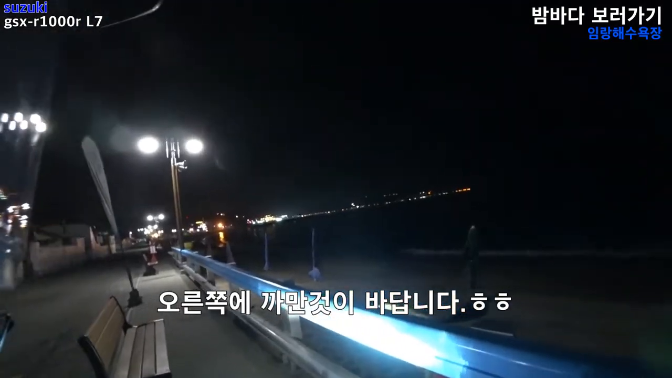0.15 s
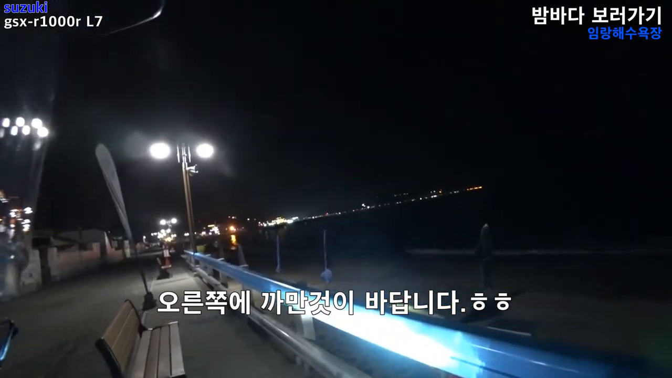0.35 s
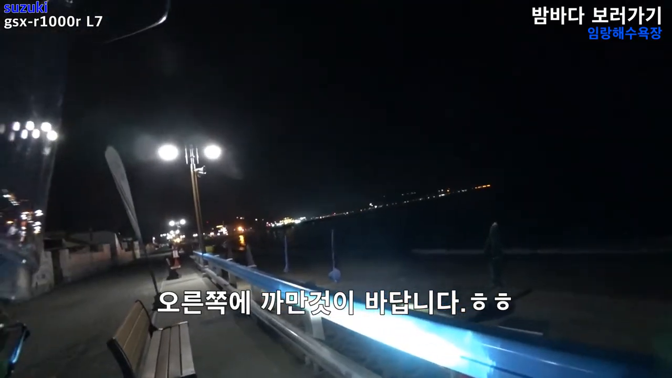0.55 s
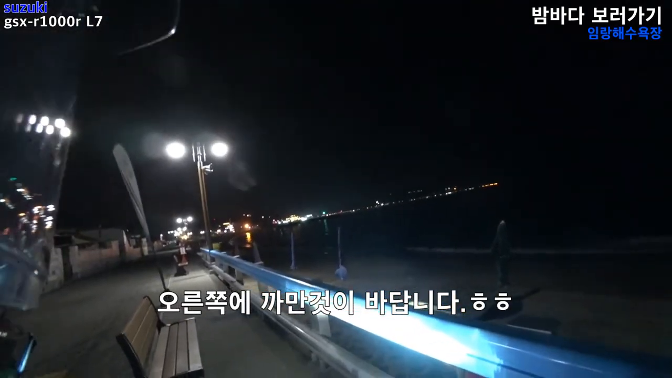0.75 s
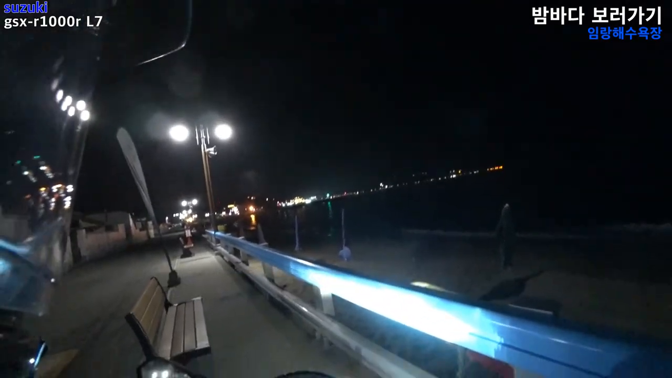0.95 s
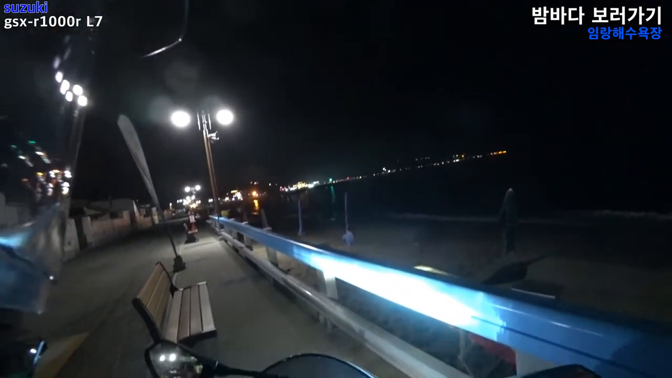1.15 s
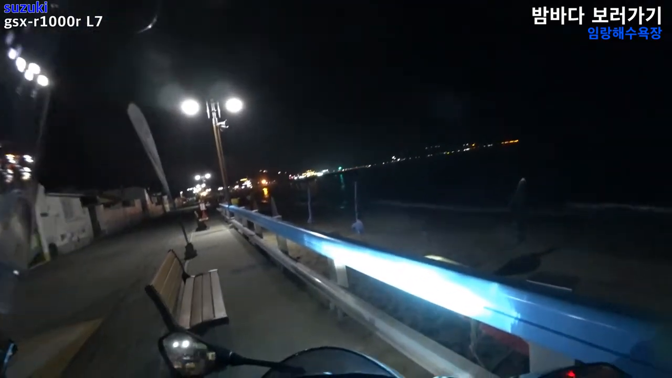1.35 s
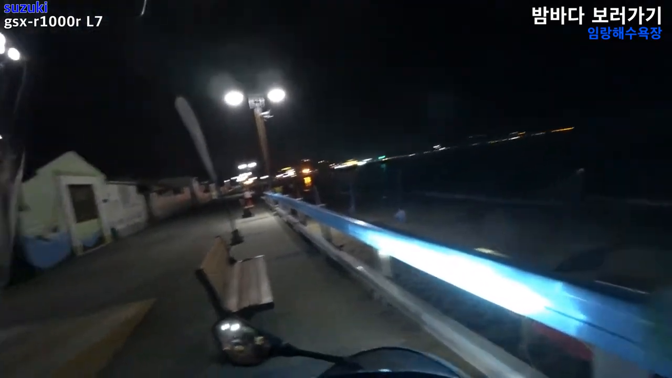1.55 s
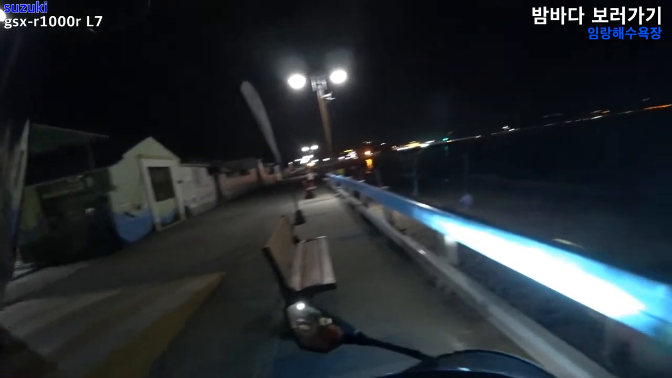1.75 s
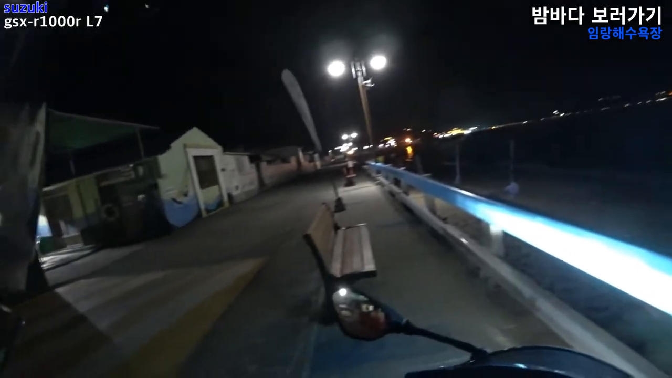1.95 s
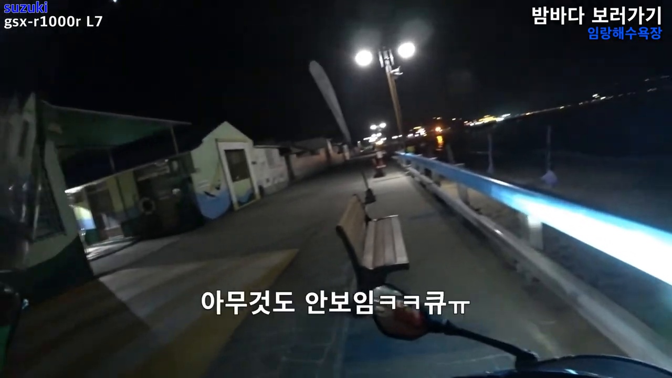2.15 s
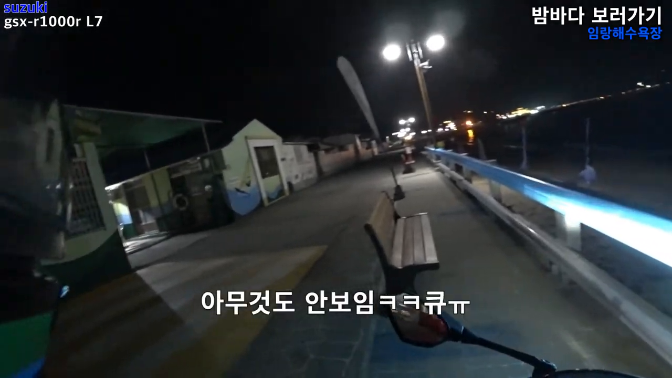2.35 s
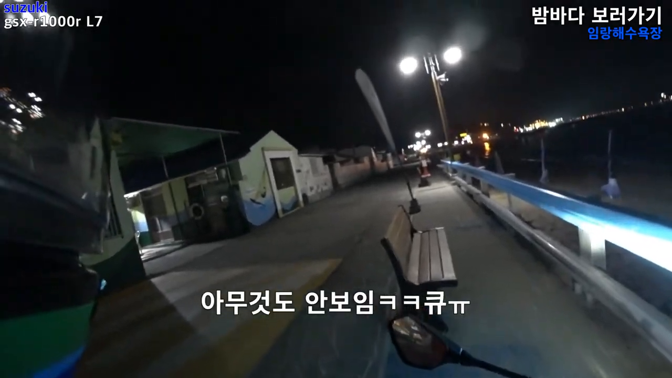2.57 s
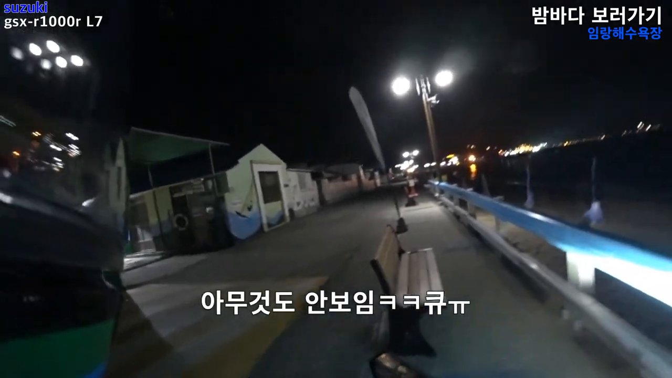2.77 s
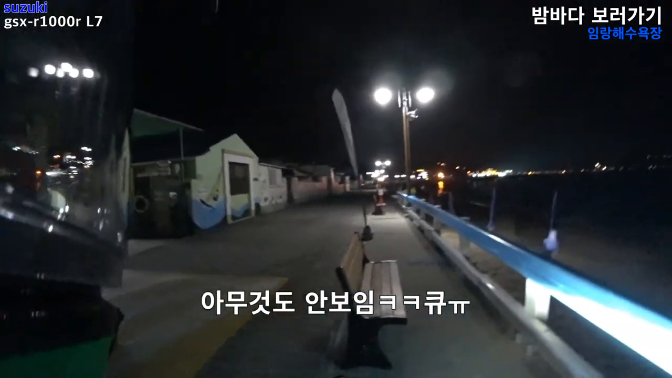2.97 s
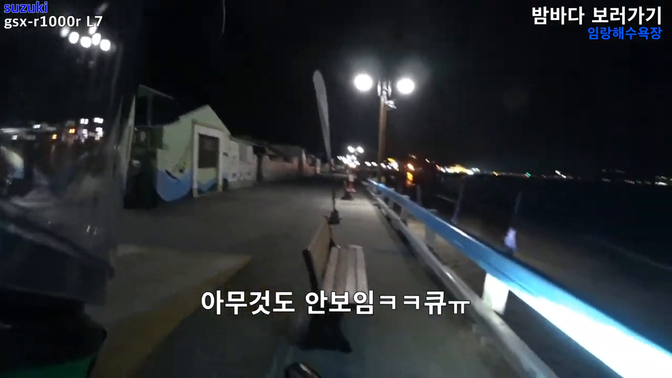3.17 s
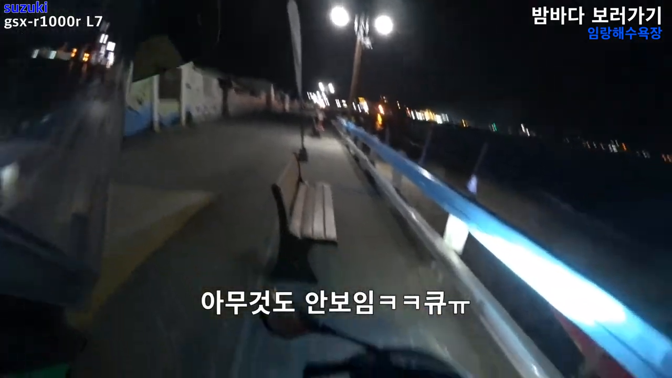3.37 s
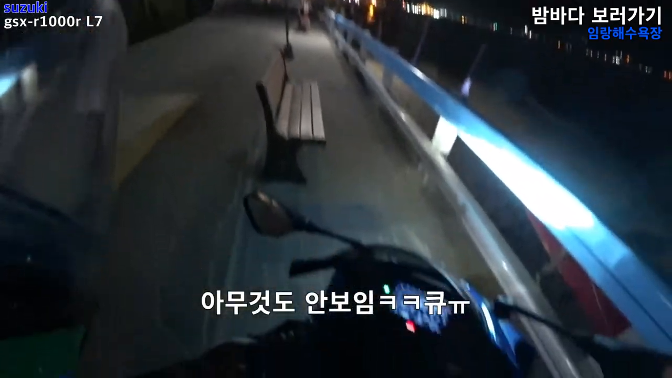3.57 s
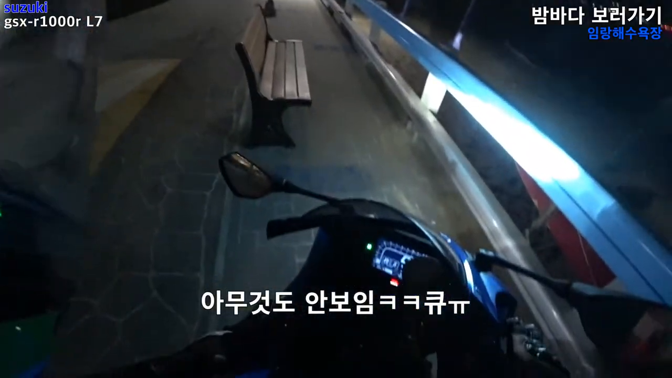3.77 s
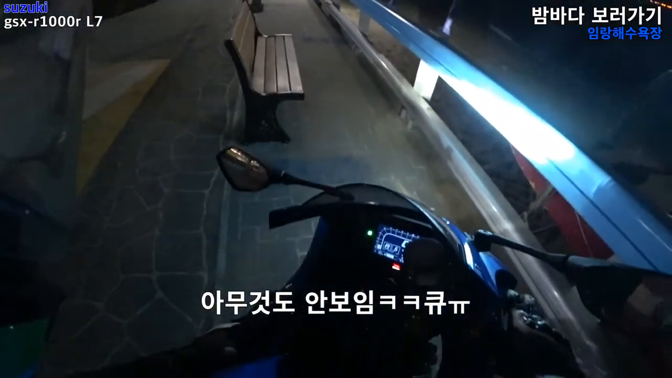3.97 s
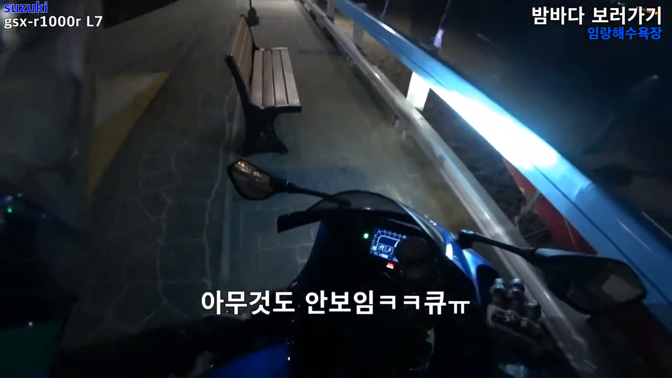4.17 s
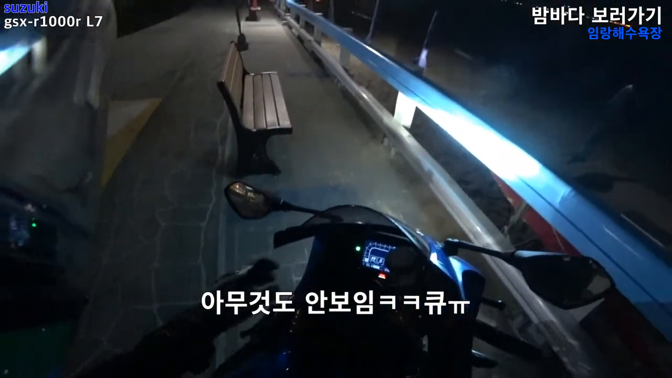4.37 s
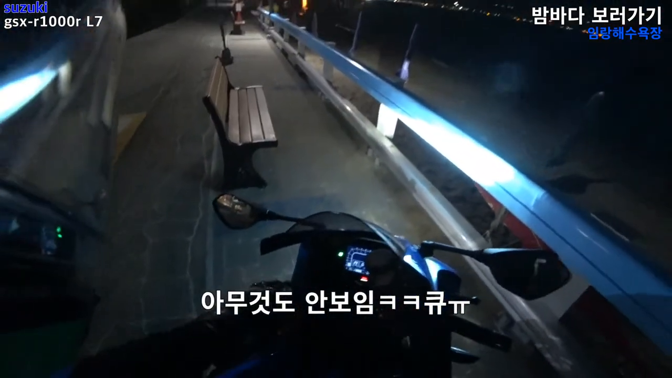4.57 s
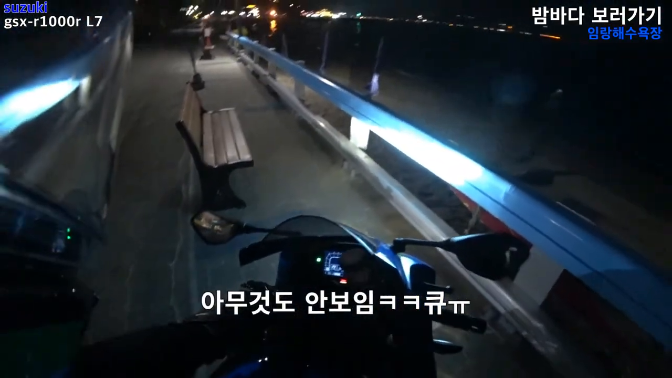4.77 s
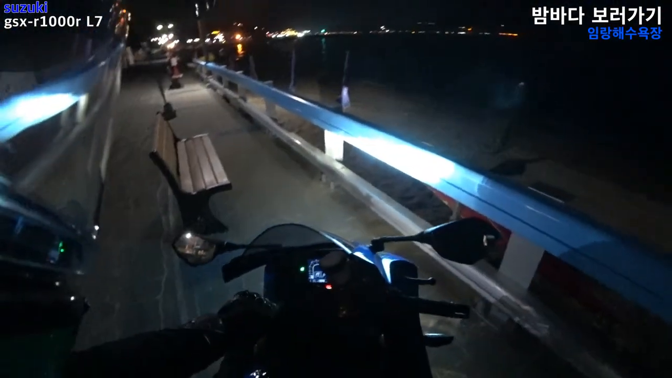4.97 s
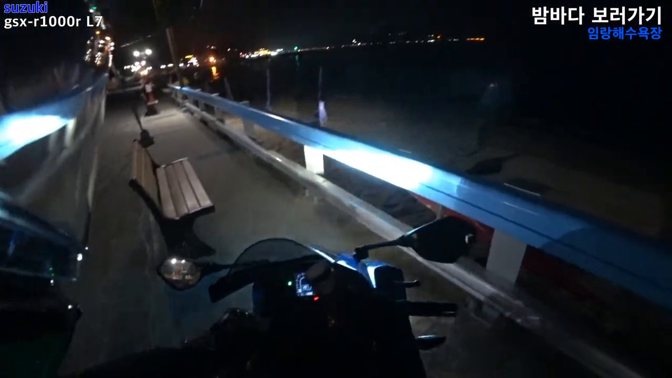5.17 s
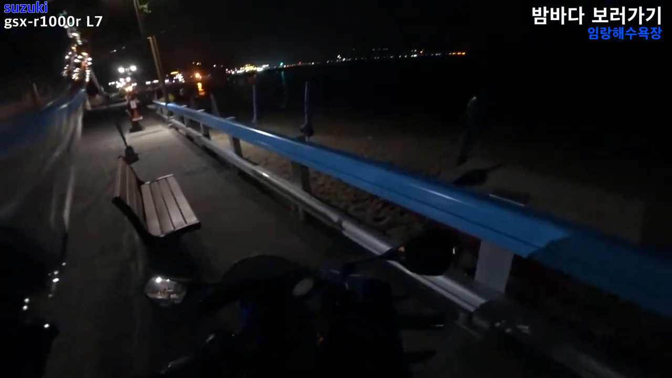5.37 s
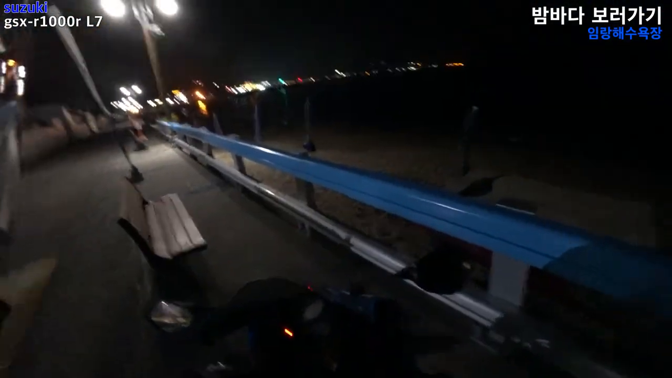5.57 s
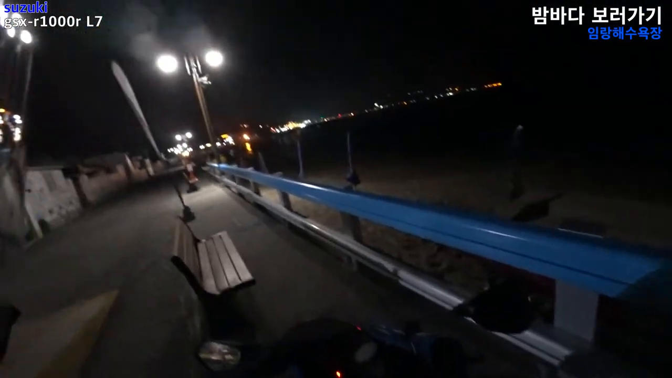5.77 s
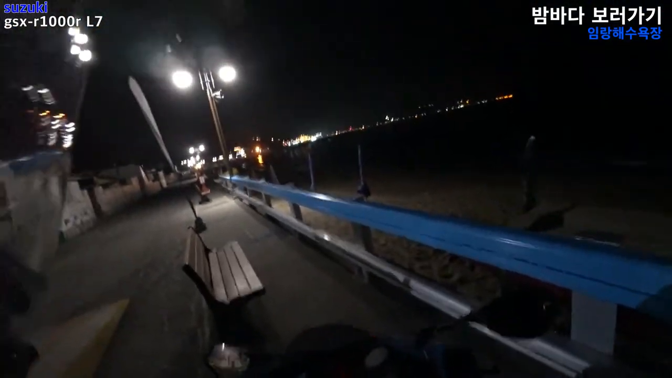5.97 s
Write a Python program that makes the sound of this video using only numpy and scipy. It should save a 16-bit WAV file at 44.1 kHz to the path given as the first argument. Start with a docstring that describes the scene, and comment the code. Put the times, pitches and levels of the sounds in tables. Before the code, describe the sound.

A single-cylinder motorcycle idles close by from the start, a low, rapid thumping with light valve clatter and faint gear whirr, heard from the rider's helmet on a seaside promenade. A thin, faint hiss fades after the first second. The idle wavers slightly, sagging around 1.4 and 3.1 seconds, and occasional harder firings bark from the tailpipe. A few tiny, bright handlebar ticks fall between 2.7 and 3.9 seconds. From about 4.5 seconds the thump grows fuller, with more barks and clatter. At 5.3 seconds the ignition is cut and the engine runs down in a few soft strokes with a brief shudder. The key gives a quick double click at 5.5 seconds, and a glove briefly scuffs the fairing. In the quiet that follows, a dark, soft wash of surf swells as a wave rolls in, ending at about 6 seconds.

```python
"""A single-cylinder motorcycle thumps at idle, each firing a puff of gas ringing the silencer.
The idle hunts, valves clatter on the cases, gears whirr and the hardest firings bark at the tailpipe.
The ignition is cut, the engine runs down, the key clicks and a glove scuffs the fairing. Heard from
the rider's helmet on a seaside promenade at night, a wave rolls in as gain control lifts the surf."""
import sys
import numpy as np
from scipy import signal
from scipy.fft import rfft, irfft
from scipy.io import wavfile
from scipy.ndimage import uniform_filter1d, minimum_filter1d

SR = 44100
rng = np.random.default_rng(int(sys.argv[2]) if len(sys.argv) > 2 else 0)


def digitize_waveform(pressure):
    """Quantize a signal to 16-bit integers and store it at the path in sys.argv[1].

    Rows of a 2-D input are taken as channels; values are limited to [-1, 1].
    """
    field = np.atleast_2d(pressure).T
    bounded = np.clip(field, -1, 1)
    quanta = np.round(bounded * 32767).astype(np.int16)
    wavfile.write(sys.argv[1], SR, quanta)


N = 265923
T = np.arange(N) / SR
HZ = np.maximum(np.arange(N // 2 + 1) * SR / N, 1)
IDLE_HZ, IGNITION_OFF_S = 41.805, 5.33

# Levels in the tables are relative; each layer sets its own trim.
# The idle sags (-) or surges (+): t/s, change in firing rate/Hz, width/s
IDLE_SWINGS = [(0.04, -2.27, 0.097), (0.571, -1.0, 0.045), (1.38, -4.17, 0.05), (2.041, -1.69, 0.022),
               (2.171, -1.91, 0.043), (2.425, 1.49, 0.024), (2.554, -2.19, 0.046), (3.093, -4.05, 0.029),
               (3.919, -1.26, 0.091), (4.453, 2.85, 0.032), (4.52, -1.05, 0.16), (4.828, -2.29, 0.057),
               (5.083, -1.94, 0.034), (5.226, 1.08, 0.043)]
# Single firings nudged in strength, mostly lean, weak burns: t/s, level/dB
LEAN_BURNS = [(.908, -3.5), (1.421, 0.5), (1.587, -1), (2.19, -1), (3.055, 0.5), (4.82, -1)]
# Silencer and air-box resonances: f/Hz, width/Hz, level/dB
SILENCER_MODES = [(48.16, 12.9, -9.5), (137.6, 18.7, -18.5), (251, 130.3, -8), (395, 63, -9)]
# Polarity of each of those resonances: sign
SILENCER_SIGNS = (1, -1, -1, 1)
# Tone of the thump as the rider looks down and back up: t/s, body level/dB, edge over body/dB
THUMP_TONE = [(0, -1.5, -2), (1.1, 0.3, -1.5), (1.9, -0.4, 0.5), (3.25, 0.75, 2.5), (3.7, -4.5, 5.5),
              (4.3, 0, 3), (4.6, 3, -1.5), (4.97, 5, -7), (5.33, 6.5, -8)]
# Unfired strokes suck air back as the engine runs down: t/s, level/dB, puff width/s
RUN_DOWN_STROKES = [(5.347, -5.5, .0018), (5.376, -8, 0.0012), (5.411, -4.5, 0.0015), (5.458, -3, 0.0019)]
# Ring of the engine cases: f/Hz, width/Hz, level/dB
CASE_MODES = [(479.6, 21, 2), (550, 38, -18.5), (691, 59, -11.5), (905, 30, -18), (1143, 81, -16),
              (1368, 130, -15), (1654, 62, -21), (2480, 160, -18), (3830, 220, -19)]
# Rustle of chain and gears: f/Hz, level/dB
RUSTLE_COLOUR = [(200, -12.5), (330, -7.5), (480, 11.5), (650, -12.5), (820, -15), (1000, -8),
                 (1250, -12.5), (1650, -10.5), (2000, -65), (2600, -14.5), (3200, -25), (3800, -22),
                 (4600, -35.5), (11000, -55)]
# Fader for the mechanical clatter: t/s, level/dB
CLATTER_FADER = [(0, -40.5), (.8, -39.5), (1.4, -37.5), (2.0, -40), (2.8, -40), (3.6, -40.5), (4.4, -38.5),
                 (5.0, -35), (5.33, -31), (5.45, -26.5), (5.55, -67)]
# Tones of the meshing gears: f/Hz, width/Hz, level/dB
GEAR_BANDS = [(992, 160, 0.5), (1640, 120, -3.5)]
# Fader for the gear whirr: t/s, level/dB
WHIRR_FADER = [(0, -47), (.3, -44.5), (1.1, -47), (1.6, -53.5), (2.2, -54), (3.1, -49.5), (3.7, -66),
               (5.3, -68), (5.5, -84)]
# How hard the crank shakes the frame: t/s, level/dB
SHUDDER_FADER = [(0, -28), (5.3, -25), (5.35, -22.5), (5.41, -23.5), (5.46, -36), (5.5, -63)]
# Rumble of frame and fairing: f/Hz, level/dB
SHUDDER_COLOUR = [(20, -14.5), (62, -1.5), (85, 0), (150, -2.5), (260, -.5), (400, -26.5), (900, -56)]
# Dashboard rattle, clearer as the rider looks down: t/s, level/dB
RATTLE_FADER = [(0, -73), (2.9, -69), (3.6, -62), (4.5, -64.5), (5.3, -53.5), (5.5, -85)]
# Thin, bright hiss: f/Hz, level/dB
HISS_COLOUR = [(2500, -23.5), (4500, -5), (6800, -2.5), (9000, -2.5), (11000, -4.5)]
# Fader for the opening hiss: t/s, level/dB
HISS_FADER = [(0, -54.5), (.8, -52.5), (1.03, -56), (1.2, -76), (1.5, -110)]
# Dark wash of the surf: f/Hz, level/dB
SURF_COLOUR = [(30, 6.5), (100, -1), (165, 2), (300, 2), (520, -3), (590, -6.5), (660, -11.5), (1300, -18),
               (1650, -17), (2500, -21), (4300, -32.5), (6500, -34.5), (8800, -36.5), (11000, -35)]
# Hum of the helmet's hollow: f/Hz, width/Hz, level/dB
HELMET_MODES = [(228, 15, -10.5), (487, 25, -9.5), (602, 40, -6.5)]
# A wave comes in: t/s, level/dB
WAVE_FADER = [(0, -38), (5.3, -35.5), (5.6, -32.5), (5.72, -32), (5.85, -31), (5.95, -24.5), (6.03, -22)]
# Spells of firings hard enough to bark: first t/s, last t/s, level/dB
BARK_SPELLS = [(1.053, 1.053, -10), (2.311, 2.311, -3), (2.789, 2.789, -11), (4.428, 4.428, -2.5),
               (4.714, 4.714, -6), (4.950, 5.040, 1), (5.156, 5.296, 1)]
# Small ticks from the handlebar controls: t/s, level/dB, f/Hz
CONTROL_TICKS = [(2.737, -48.5, 7400), (3.135, -48, 6500), (3.44, -51, 7000), (3.90, -55, 6500)]
# The key snaps through its detent: t/s, level/dB
KEY_SNAPS = [(5.484, -27.5), (5.491, -35)]
# Colour of the key's snap: f/Hz, level/dB
SNAP_COLOUR = [(300, -24), (900, -9), (1500, 6.5), (2300, -8.5), (3000, -5), (4500, -9.5), (7000, -18),
               (11000, -16)]
# Scuff of glove on fairing: f/Hz, level/dB
GLOVE_COLOUR = [(100, -18.5), (280, 10.5), (560, -10.5), (800, -9), (1200, -21), (1600, -11), (2200, -23.5),
                (6000, -42)]
# Pressure of the glove: t/s, level/dB
GLOVE_FADER = [(5.46, -81), (5.49, -27.5), (5.55, -29.5), (5.6, -40.5), (5.68, -79)]
# The two microphone ports on the helmet: f/Hz, left over right/dB, likeness/0-1, left lag/ms
MIC_PORTS = [(60, .8, 1, .05), (250, .9, .999, .045), (500, 1.7, .97, .05), (1000, 4.2, .93, .06),
             (2000, 5.8, .5, .15), (3200, -.5, .35, .15), (7000, -1, .25, .15), (8800, -1.5, .15, .15),
             (10300, -7, .15, .15)]


def undb(db):
    """Decibels to gain."""
    return 10 ** (np.asarray(db) / 20)


def curve(rows, column=1):
    """One column of a time table at every sample."""
    rows = np.array(rows)
    return np.interp(T, rows[:, 0], rows[:, column])


def spectrum(rows, column=1):
    """One column of a frequency table at every bin."""
    rows = np.array(rows)
    return np.interp(np.log(HZ), np.log(rows[:, 0]), rows[:, column])


def bell(u):
    """A smooth bump of height 1 and width 1."""
    return np.exp(-u ** 2 / 2)


def resonate(x, hz, width):
    """Band-pass resonance, gain 1 at the centre, width in Hz."""
    return signal.lfilter(*signal.iirpeak(hz, hz / width, fs=SR), x)


def cut(x, order, hz, kind="low"):
    """Low-pass or high-pass filter."""
    return signal.sosfilt(signal.butter(order, hz, kind, fs=SR, output="sos"), x)


def wander(rate_hz):
    """Smooth random modulation with a spread near 1."""
    span = int(SR / rate_hz)
    steps = np.repeat(rng.standard_normal(N // span + 1), span)
    return 1.82 * uniform_filter1d(uniform_filter1d(steps, span), span)[:N]


def noise(colour):
    """Coloured stereo noise of rms 1: centred in the bass, wide in the treble."""
    likeness = np.clip(spectrum(MIC_PORTS, column=2), -1, 1)
    mid, side = rfft(rng.standard_normal((2, N)))
    pair = mid * np.sqrt(1 + likeness) + np.array([[1], [-1]]) * side * np.sqrt(1 - likeness)
    coloured = irfft(pair * undb(spectrum(colour)), N)
    return coloured / coloured.std()


def puffs(times, volumes, widths):
    """Bell-shaped puffs of gas; for the same volume, a shorter puff is sharper."""
    flow = np.zeros(N)
    for at, volume, width in zip(times, volumes, widths):
        near = slice(*np.searchsorted(T, [at - 10 * width, at + 10 * width]))
        shape = bell((T[near] - at) / width)
        flow[near] += volume * shape / (shape.sum() + 1e-9)
    return flow


def strikes(times, sizes, decay_s):
    """An envelope that jumps at each strike and dies away."""
    hits = np.zeros(N)
    np.add.at(hits, np.clip(np.asarray(times) * SR, 0, N - 1).astype(int), sizes)
    return signal.lfilter([1], [1, -np.exp(-1 / (decay_s * SR))], hits)


def firing_rate():
    """The idle hunts: the governor overcorrects each sag or surge with a smaller swing the other way."""
    rebound, lag_widths = .347, 2.5
    return IDLE_HZ + sum(hz * (bell((T - at) / width) - rebound * bell((T - at) / width - lag_widths))
                         for at, hz, width in IDLE_SWINGS)


def firings():
    """Time and strength of every firing: stronger when the engine runs fast, and no two burn alike."""
    start_cycle, jitter_s = .275, .00012
    effort_db_per_hz, scatter_db, carry_over = .5, .5, .35
    rate_hz = firing_rate()
    cycles = start_cycle + np.cumsum(rate_hz) / SR
    count = int(np.interp(IGNITION_OFF_S, T, cycles))
    jitter, luck = rng.standard_normal((count, 2)).T
    times = np.interp(np.arange(1, count + 1), cycles, T) + jitter_s * jitter
    lean_times, lean_levels = np.transpose(LEAN_BURNS)
    lean_db = (np.abs(times[:, None] - lean_times) < 1 / (2 * IDLE_HZ)) @ lean_levels
    effort_db = effort_db_per_hz * (np.interp(times, T, rate_hz) - IDLE_HZ) + .1 * bark_sizes(times)
    # a weak burn leaves fuel that strengthens the next
    luck_db = scatter_db * (luck - carry_over * np.roll(luck, 1))
    return times, effort_db + lean_db + luck_db


def exhaust(times, strength_db):
    """Puffs ring the silencer: a stronger burn is bigger and shorter, the unfired last strokes soft."""
    widths = .0011 * undb(-.3 * strength_db + .27 * rng.standard_normal(len(times)))
    fired = puffs(times, undb(.069 * strength_db), widths)
    suck_times, suck_db, suck_widths = np.transpose(RUN_DOWN_STROKES)
    sucked = puffs(suck_times, undb(suck_db), suck_widths)
    flow = (fired - sucked) * (1 + .031 * wander(900))  # turbulence
    thump = undb(55.5) * sum(sign * undb(db) * resonate(flow, hz, width)
                             for sign, (hz, width, db) in zip(SILENCER_SIGNS, SILENCER_MODES))
    # three moving EQ bands: deep boom, hollow body, hard edge
    body_db = curve(THUMP_TONE)
    edge_db = body_db + curve(THUMP_TONE, column=2)
    boom = (undb(.21 * body_db) - 1) * resonate(thump, 55, 90)
    body = (undb(body_db) - 1) * resonate(thump, 214, 110)
    edge = (undb(edge_db) - 1) * resonate(thump, 352, 170)
    return thump + boom + body + edge


def clatter(times, strength_db):
    """Combustion knock and three valve taps a cycle ring the cases, over rustling chain and gears."""
    knock_sizes = undb(2 * strength_db + 2 * rng.standard_normal(len(times)))
    valve_phases = np.array([.17, .42, .85])
    tap_times = (times[:-1, None] + np.diff(times)[:, None] * valve_phases).ravel()
    tap_sizes = undb(3 * rng.standard_normal(len(tap_times)))
    knock_pulse = strikes(times, knock_sizes, decay_s=.004)
    tap_pulse = strikes(tap_times, tap_sizes, decay_s=.0016)
    rustle = noise(RUSTLE_COLOUR) * (.6 + knock_pulse + .68 * tap_pulse)
    knocks = strikes(times + .0012, knock_sizes, decay_s=.00003)
    taps = strikes(tap_times, tap_sizes, decay_s=.00003)
    blows = cut(knocks + .57 * taps, order=4, hz=3000)  # the oil film cushions each blow
    ring = sum(undb(db) * resonate(blows, hz, width) for hz, width, db in CASE_MODES)
    return (rustle + undb(39.5) * ring) * undb(curve(CLATTER_FADER))


def gear_whirr():
    """The meshing gears sing in two narrow bands, each wavering in strength."""
    rub = rng.standard_normal(N)
    whirr = sum(resonate(resonate(rub, hz, width), hz, width) * undb(db + 1.1 * wander(18))
                for hz, width, db in GEAR_BANDS)
    return whirr / whirr.std() * undb(curve(WHIRR_FADER))


def frame_shudder():
    """The frame and fairing rumble faintly, and shake harder as the crank stops."""
    return noise(SHUDDER_COLOUR) * undb(curve(SHUDDER_FADER))


def dashboard_rattle(times, strength_db):
    """Each firing sets a loose part buzzing briefly."""
    hz, width = 3950, 700
    buzz = resonate(resonate(rng.standard_normal(N), hz, width), hz, width)
    jolts = strikes(times, undb(strength_db), decay_s=.02)
    return buzz / buzz.std() * jolts * undb(curve(RATTLE_FADER))


def hiss():
    """A thin, slightly grainy hiss that fades after the first second."""
    grain_db = .6 * wander(25) + 1.5 * wander(300)
    return noise(HISS_COLOUR) * undb(curve(HISS_FADER) + grain_db)


def surf():
    """Waves wash on the beach and hum in the hollow of the helmet; roar and fizz waver separately."""
    wash = noise(SURF_COLOUR)
    wash = wash + sum(undb(db) * resonate(wash, hz, width) for hz, width, db in HELMET_MODES)
    roar = cut(wash, order=2, hz=700) * undb(.27 * wander(22))
    fizz = cut(wash, order=2, hz=700, kind="high") * undb(1.03 + .14 * wander(12))
    return (roar - fizz) * undb(curve(WAVE_FADER))  # flipped fizz avoids a notch at the crossover


def bark_sizes(times):
    """How hard each firing barks: nothing outside a spell, most in its middle."""
    taper_db = 7
    sizes = np.zeros(len(times))
    for first, last, db in BARK_SPELLS:
        place = (2 * times - first - last) / (abs(last - first) + 1 / IDLE_HZ)  # -1 to 1 in the spell
        sizes += (np.abs(place) < 1) * undb(db - taper_db * np.minimum(place ** 2, 1))
    return sizes


def tailpipe_bark(times):
    """The hardest firings steepen into a short crack at the tailpipe."""
    crack = puffs(times + .0016, bark_sizes(times), widths=np.full(len(times), .00016))
    return undb(17) * resonate(resonate(crack, 570, 420), 720, 700)


def handlebar_ticks():
    """The controls give light, bright ticks."""
    return undb(6.5) * sum(
        strikes([at], [undb(db)], decay_s=.0063) * resonate(rng.standard_normal(N), hz, 1800)
        for at, db, hz in CONTROL_TICKS)


def key_click():
    """The ignition key snaps through its detent in a quick double click."""
    times, db = np.transpose(KEY_SNAPS)
    return noise(SNAP_COLOUR) * strikes(times, undb(db), decay_s=.007)


def glove_scuff():
    """The gloved hand scuffs the fairing after turning the key."""
    return noise(GLOVE_COLOUR) * undb(curve(GLOVE_FADER) + 2 * wander(100))


def helmet_shading(air):
    """The helmet shades each port in its own bands, and the left hears slightly late."""
    side = np.array([[.5], [-.5]])
    shade = undb(side * spectrum(MIC_PORTS))
    lag_s = spectrum(MIC_PORTS, column=3) / 1000
    return irfft(rfft(air) * shade * np.exp(-2j * np.pi * HZ * lag_s * side), N)


def scene():
    """The bike below the rider and the sea around, in stereo at the helmet."""
    times, strength_db = firings()
    bike = exhaust(times, strength_db) + tailpipe_bark(times) + clatter(times, strength_db)
    bike = bike + dashboard_rattle(times, strength_db) + gear_whirr() + frame_shudder()
    rider = handlebar_ticks() + key_click() + glove_scuff()
    return helmet_shading(bike + rider + hiss() + surf())


def gain_control(x, target_db, hold_s, detector_fall_db_per_s, ratio):
    """The gain drops at once on loud sound, waits, then creeps back up."""
    power = uniform_filter1d(np.mean(x ** 2, axis=0), size=4240)
    level_db = 10 * np.log10(power + 1e-12)
    half_hold = int(hold_s * SR / 2)
    held_db = -minimum_filter1d(-level_db, 2 * half_hold + 1, origin=half_hold)
    fall_db = detector_fall_db_per_s * T
    sensed_db = np.maximum.accumulate(held_db + fall_db) - fall_db
    return x * undb((target_db - sensed_db) * (1 - 1 / ratio))


def record(dry):
    """The helmet microphone rides its gain, rounds the tallest peaks and cuts the top."""
    ceiling, fade_s, top_hz = .98, .003, 11100
    levelled = gain_control(dry, target_db=-12, hold_s=.11, detector_fall_db_per_s=45, ratio=3.38)
    rounded = levelled / (1 + (levelled / ceiling) ** 8) ** (1 / 8)
    faded = rounded * np.clip(np.minimum(T, T[-1] - T) / fade_s, 0, 1)
    return signal.sosfilt(signal.ellip(12, .2, 80, top_hz, fs=SR, output="sos"), faded)


dry = scene()
out = record(dry)
digitize_waveform(out)
```